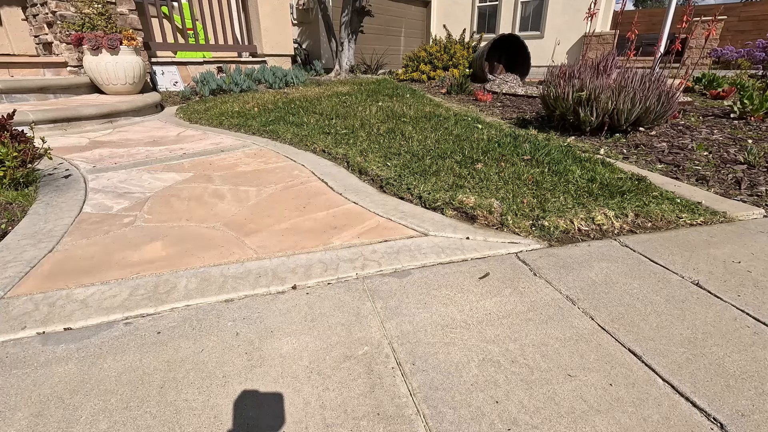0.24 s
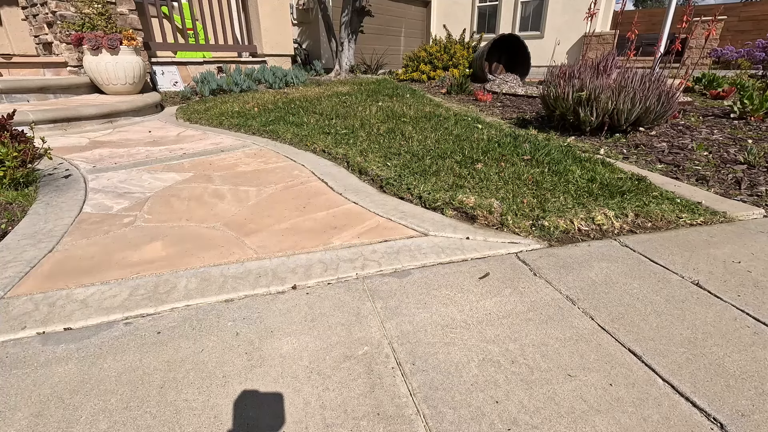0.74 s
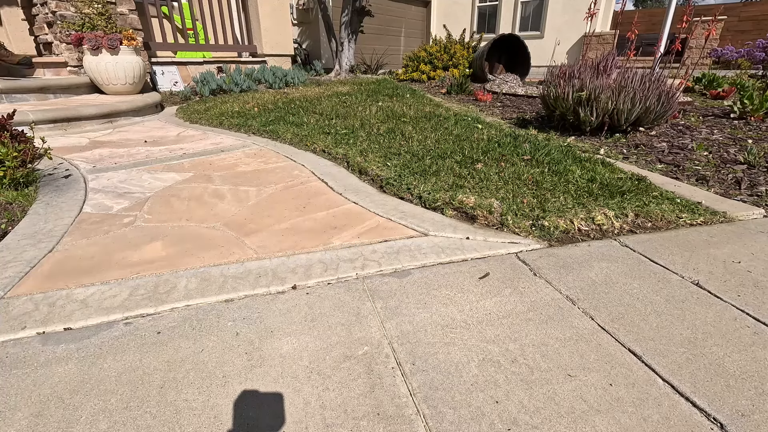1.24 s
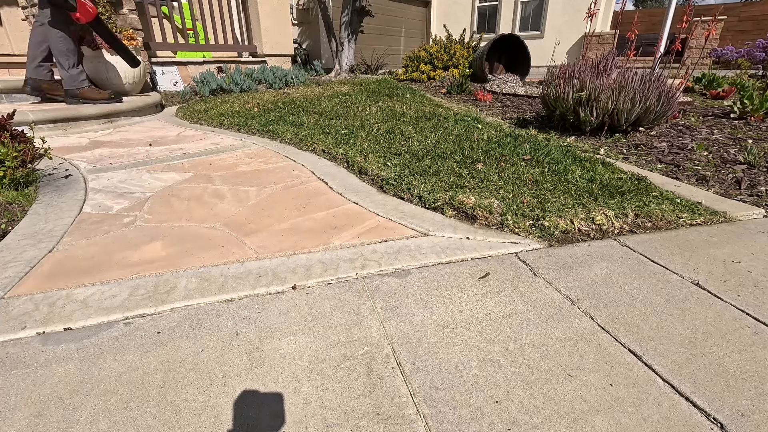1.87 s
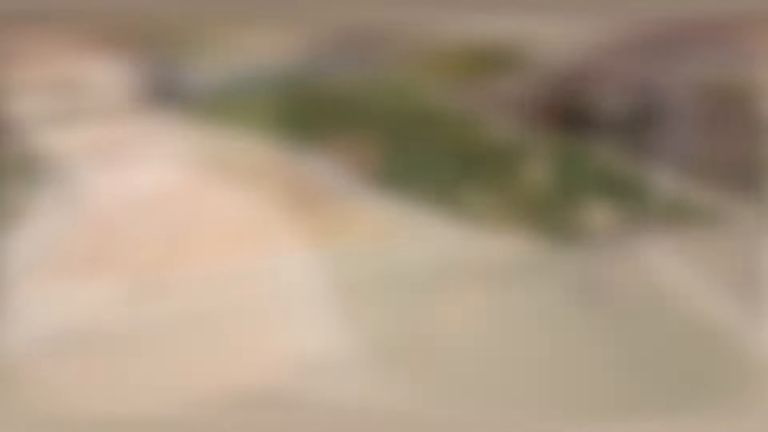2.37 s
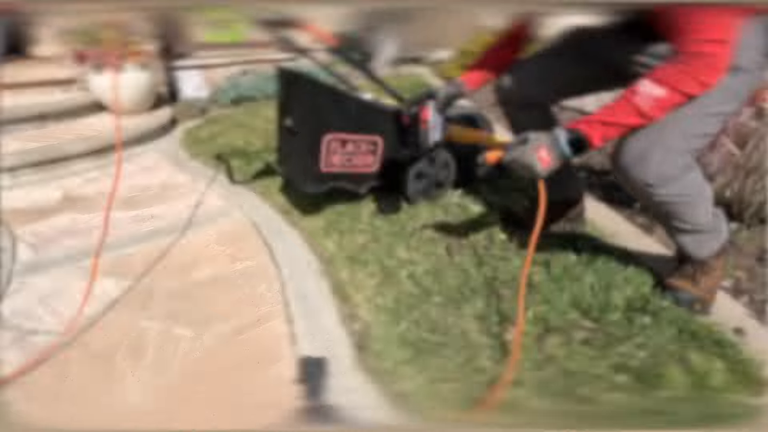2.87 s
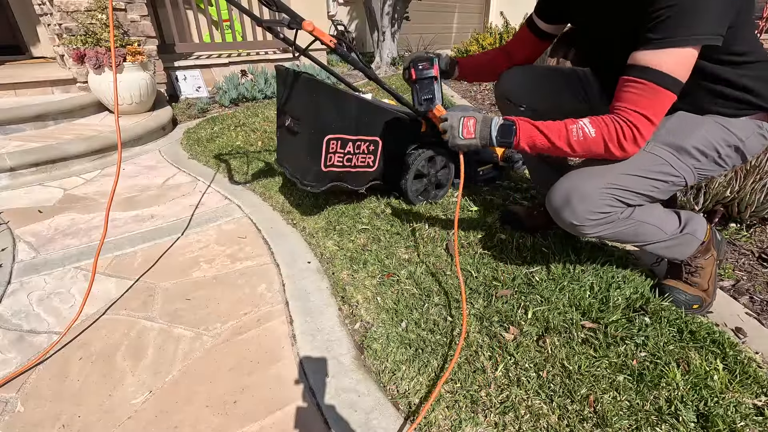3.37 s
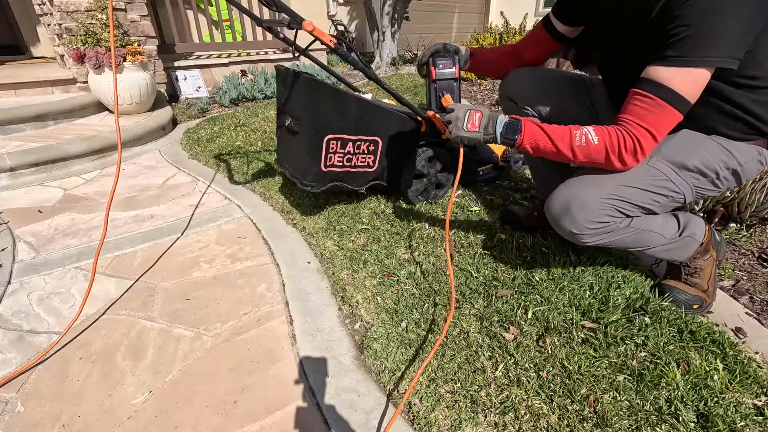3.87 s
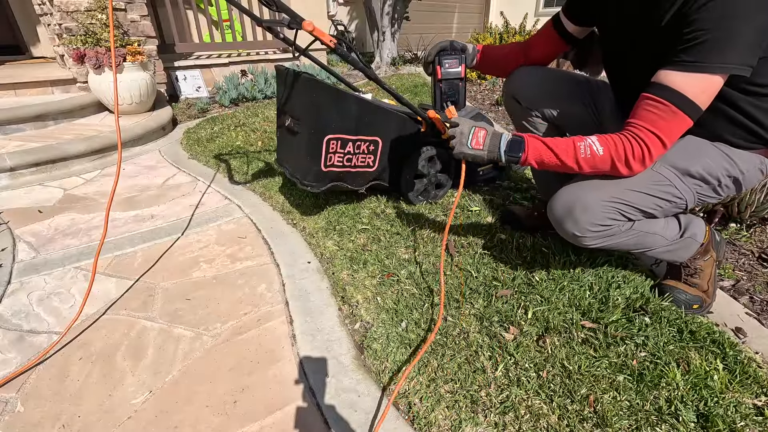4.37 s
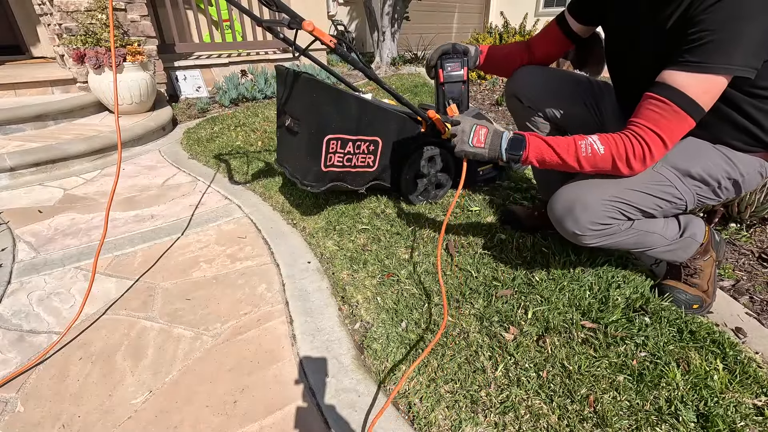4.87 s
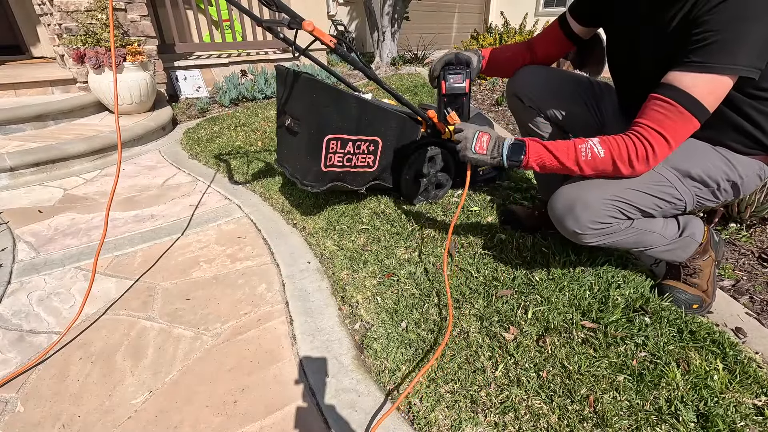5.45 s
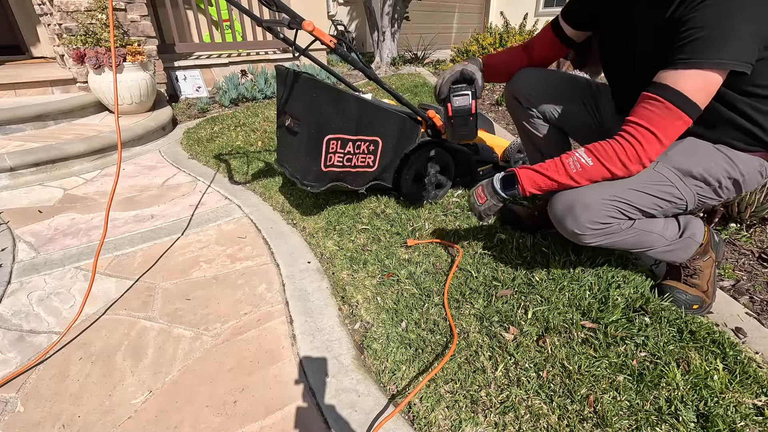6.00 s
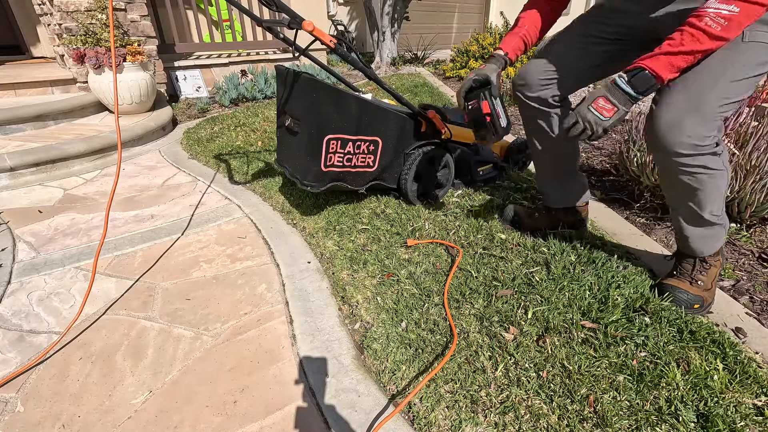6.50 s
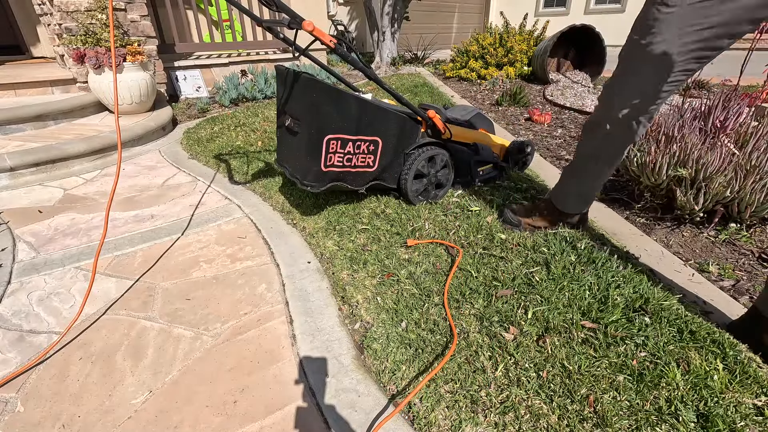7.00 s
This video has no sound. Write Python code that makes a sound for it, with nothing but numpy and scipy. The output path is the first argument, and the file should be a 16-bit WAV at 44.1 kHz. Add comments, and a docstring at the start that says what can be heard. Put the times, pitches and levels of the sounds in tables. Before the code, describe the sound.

Outdoors by a house, an electric mower motor spins down, abruptly surges to a shrill wavering whine with airy roar, stutters as its pitch dips, then coasts to a stop. Quiet yard with low traffic rumble remains. Close by, a plastic latch snaps repeatedly with hollow housing knocks and glove rustle; finches chirp to the left. Soft steps end it. The stereo microphone is near, with short wall reflections.

```python
"""An electric motor on a lawn coasts down, is switched on, whines, sputters as its pitch dips and recovers, and
coasts to rest: its tones follow the shaft speed, over a roar of noise. Far traffic is filtered noise, and
hands and shoes rustle in fine noise grains. Finches chirp to the left in gliding tones. A plastic latch is
snapped again and again: noise bursts ring damped modes. House walls answer with a decaying noise tail."""
import sys
import numpy as np
from scipy import signal
from scipy.fft import rfft, irfft, next_fast_len
from scipy.io import wavfile
from scipy.ndimage import uniform_filter1d, map_coordinates

SR = 44100
rng = np.random.default_rng(int(sys.argv[2]) if len(sys.argv) > 2 else 0)


def to_wav(s):
    """Save 16-bit WAV."""
    ch = np.atleast_2d(s).T  # columns
    pcm = np.round(np.clip(ch, -1, 1) * 32767)  # PCM
    wavfile.write(sys.argv[1], SR, pcm.astype(np.int16))


N = 318930

# Levels in the tables are relative: the functions trim them, and the spectra give only a shape.

# Commutator tone while driven, 12 bars a turn: (time [s], pitch [Hz])
DRIVEN_PITCH = [(.325, 540), (.346, 1800), (.36, 2450), (.376, 2975), (.4, 3100), (.44, 3210), (.5, 3300),
                (.57, 3345), (.7, 3356), (1.485, 3358), (1.545, 2950), (1.57, 3190), (1.603, 3275),
                (1.64, 2950), (1.68, 2750), (1.75, 3080), (1.772, 2700), (1.8, 2600), (1.83, 2950),
                (1.868, 3090), (1.9, 2590)]
# Moments at which each coast would come to rest if left alone: time [s]
REST_TIMES = (1.098, 3.116)
# Spans of full motor power: (start [s], end [s])
POWER_SPANS = [(.315, 1.49), (1.543, 1.734), (1.685, 2.1), (1.805, 1.96)]
# Whine wavering while driven: (time [s], bar tone level [dB], octave level [dB])
WHINE_LEVELS = [(.325, -41, -64), (.365, -55, -39), (.385, -31.5, -32), (.44, -37, -32), (.57, -29.5, -28),
                (.66, -37.5, -34.5), (.766, -30, -27.5), (.89, -36, -42), (.95, -22, -38),
                (1, -29.5, -29.5), (1.066, -49, -33), (1.095, -25.5, -36), (1.144, -37, -27),
                (1.3, -33, -31.5), (1.42, -32, -34), (1.49, -41, -25.5), (1.52, -38, -52),
                (1.585, -33.5, -29), (1.63, -66, -43), (1.68, -63, -62), (1.71, -30.5, -44),
                (1.75, -37, -32), (1.772, -33, -55), (1.815, -44, -55), (1.865, -27, -33.5),
                (1.9, -39, -64)]
# Pitches the shell favours while coasting: (bar tone pitch [Hz], bar tone level [dB])
COAST_BAR = [(220, -90), (280, -50), (340, -54), (460, -51.5), (530, -43.5), (600, -42.5), (700, -55),
             (790, -59), (890, -53), (980, -59), (1090, -35.5), (1200, -45), (1350, -37.5), (1600, -42),
             (1850, -24.5), (2000, -28), (2300, -40), (2600, -31.5)]
# The same for the octave: (bar tone pitch [Hz], octave level [dB])
COAST_OCTAVE = [(600, -85), (690, -50), (800, -62), (900, -51), (980, -70), (2600, -75)]
# Rasps of the housing as current surges in: (start [s], length [s], pitch [Hz], level [dB])
SURGE_RASPS = [(0.31, .047, 3210, -33.5), (.33, 0.031, 1824, -29), (0.337, 0.046, 1417, -29.5),
               (0.349, 0.022, 2480, -28.5), (1.687, 0.024, 3260, -30), (1.802, 0.02, 3230, -27)]
# Once-a-turn shake: (time [s], level [dB])
SHAKE_LEVELS = [(0.34, -46), (0.366, -30.5), (0.4, -27), (0.432, -30.5), (0.56, -24.5), (0.87, -28.5),
                (1.088, -24), (1.162, -32.5), (1.18, -24.5), (1.26, -21.5), (1.342, -27.5), (1.468, -25),
                (1.542, -36.5), (1.616, -23), (1.676, -57), (1.708, -22), (1.744, -48), (1.764, -35.5),
                (1.874, -27), (1.898, -32), (1.93, -34), (2.0, -32.5)]
# Higher shaft orders: (multiple of shaft speed, level against the shake [dB])
SHAFT_ORDERS = [(2, -20.5), (3, -24), (4, -13), (5, -17.5), (6, -19.5), (7, -20.5), (8, -27), (9, -24.5),
                (13, -31.5), (36, -28)]
# Roar of cooling air and brushes: (frequency [Hz], density [dB per Hz])
ROAR_SPECTRUM = [(330, -46), (560, -3), (700, -14.5), (1120, -7), (1900, -10), (2380, -10.5), (3100, -6.5),
                 (3600, -9), (4300, -12), (5800, -7.5), (7200, -7), (10000, -21.5), (12400, -22.5),
                 (14500, -37), (15600, -58)]
# Low flutter: (frequency [Hz], density [dB per Hz])
FLUTTER_SPECTRUM = [(40, -35.5), (90, -1.5), (170, 4), (300, 0), (480, -0.5), (650, -33.5)]
# Puffs of the flutter: (time [s], level [dB])
FLUTTER_PUFFS = [(.34, -28.5), (.42, -30.5), (.69, -29), (.75, -29.5), (.85, -26.5), (.96, -29.5),
                 (1.01, -39), (1.13, -34.5), (1.48, -40.5), (1.65, -46.5), (1.776, -39)]
# Motor balance: (frequency [Hz], left minus right [dB])
MOTOR_BALANCE = [(60, 2.5), (100, -2), (180, 0), (310, 1.5), (550, 1), (950, 4.5), (1650, 3.5), (2860, 5.5),
                 (4970, 5.5), (8640, 4.5), (15000, 9.5)]
# Stereo width of the roar: (frequency [Hz], left-right likeness [-1 to 1])
MOTOR_LIKENESS = [(60, 0.85), (150, 0.86), (380, 0.8), (950, 0.95), (2380, 0.84), (5980, 1), (15000, 0.32)]
# Stereo width of flutter and traffic rumble: (frequency [Hz], left-right likeness [-1 to 1])
RUMBLE_LIKENESS = [(30, .72), (70, .88), (150, .97)]

# Low traffic rumble: (time [s], level [dB])
RUMBLE_LEVELS = [(0, -45.5), (.3, -44), (2, -45), (2.15, -52), (2.63, -47.5), (2.72, -41), (3.45, -41.5),
                 (3.85, -44), (4.55, -43), (4.8, -44), (5.05, -43), (5.7, -46.5), (6.07, -46),
                 (6.48, -48.5), (6.65, -45), (7, -41), (7.23, -49.5)]
# Its colour: (frequency [Hz], density [dB per Hz])
RUMBLE_SPECTRUM = [(12, -20), (20, 4.5), (64, 5.5), (125, -5.5), (189, -14), (258, -25), (400, -41),
                   (520, -35.5), (880, -120)]
# Steady far traffic: (frequency [Hz], density [dB per Hz])
TRAFFIC_SPECTRUM = [(76, -8.5), (130, 1), (213, -2), (283, -4.5), (454, -14.5), (1080, -13), (2690, -26),
                    (3010, -22.5), (4570, -40.5), (5960, -40.5), (12000, -50.5), (15600, -99),
                    (22000, -120)]
# Its stereo width: (frequency [Hz], left-right likeness [-1 to 1])
TRAFFIC_LIKENESS = [(60, 1), (180, 0.96), (550, 0.75), (1650, 1), (4970, 0.43), (15000, 0.62)]
# Running rustle: (time [s], level [dB])
RUSTLE_LEVELS = [(0, -49), (.13, -69.5), (2.1, -61.5), (2.93, -64), (3.43, -71), (3.6, -79), (5.44, -76.5),
                 (6, -68), (6.5, -69.5), (7.01, -62.5), (7.17, -54.5)]
# Colour of rustle and scuffs: (frequency [Hz], density [dB per Hz])
RUSTLE_SPECTRUM = [(500, -23.5), (1200, 0.5), (2500, -6.5), (4000, -6.5), (7500, -10), (9000, -17.5),
                   (12000, -21.5), (15000, -24)]
# Short scuffs of glove, cord and shoe: (loudest [s], rise [s], fall [s], level [dB])
SCUFF_EVENTS = [(2.68, 0.14, 0.16, -57.5), (3.5, 0.2, 0.31, -59.5), (4.145, 0.015, 0.036, -56.5),
                (4.8, 0.016, 0.036, -64), (5.615, 0.011, 0.053, -54), (5.79, 0.017, .02, -66),
                (5.848, 0.02, 0.022, -40.5), (5.88, 0.028, 0.021, -58), (6.02, 0.016, 0.016, -58.5),
                (6.45, 0.1, 0.14, -55.5), (6.76, 0.15, 0.054, -54.5), (6.955, 0.012, 0.014, -50),
                (7.19, 0.033, 0.1, -49)]

# Finch notes: (start [s], length [s], from [Hz], to [Hz], level [dB], share held before the glide)
FINCH_CHIRPS = [(2.715, 0.041, 3600, 3200, -69, .3), (2.827, 0.06, 3050, 3500, -67.5, 0.32),
                (3.187, .045, 3680, 2950, -62.5, 0.39), (3.451, 0.057, 3770, 2970, -62, 0.47),
                (3.715, 0.058, 2930, 3370, -65, .2), (4.484, 0.06, 3430, 2940, -62.5, .35),
                (5.01, 0.065, 3320, 2670, -65.5, 0.35), (5.019, .035, 4300, 3710, -70, 0.36),
                (5.045, 0.037, 6000, 3860, -68.5, 0.0089), (5.066, 0.053, 3050, 3100, -58, 0.38),
                (5.442, .045, 3520, 2920, -61.5, 0.39), (5.48, .03, 2960, 2930, -67, 0.32),
                (5.744, 0.011, 7100, 4340, -67.5, 0.39), (5.902, .07, 3475, 2420, -62.5, 0.48),
                (5.935, 0.032, 6300, 4770, -76, .01), (6.611, 0.047, 4200, 3250, -64, 0.45),
                (6.62, .035, 3150, 2300, -62, 0.38), (6.654, 0.041, 3200, 3600, -52, 0.012)]
# Hoarse squeaks: (start [s], length [s], from [Hz], to [Hz], level [dB], share held before the glide)
FINCH_SQUEAKS = [(2.123, 0.029, 3960, 3900, -50.5, .3), (2.211, 0.072, 3226, 3410, -55, .4),
                 (2.232, 0.088, 3800, 4250, -50.5, 0.44)]

# Bright snaps of the latch: (time [s], level [dB], T60 [s], brightest frequency [Hz])
LATCH_SNAPS = [(2.6956, -32.5, 0.036, 4850), (2.738, -40, 0.023, 2320), (3.046, -41, 0.056, 2660),
               (3.5864, -28, 0.023, 2650), (3.8562, -27, 0.046, 2580), (3.8708, -20, 0.038, 2680),
               (3.9763, -36.5, 0.02, 3420), (4.1998, -23, 0.039, 2900), (4.208, -30, 0.028, 2510),
               (4.2178, -19, 0.041, 3370), (4.243, -31.5, 0.055, 2060), (4.5317, -20.5, 0.051, 3360),
               (4.587, -45.5, 0.03, 3020), (4.8515, -19.5, 0.026, 3630), (4.8726, -24.5, 0.02, 1800),
               (5.1452, -15.5, 0.023, 5400), (5.1704, -30, 0.058, 1820), (5.1991, -38.5, 0.028, 2670),
               (5.4008, -16, 0.022, 3800), (5.4195, -24, 0.034, 1910), (5.4398, -31.5, 0.036, 3490),
               (6.521, -38.5, 0.023, 6310), (6.7625, -30, 0.027, 2630), (7.0433, -38, 0.026, 2760)]
# Damped modes of the latch: (frequency [Hz], width [Hz], level [dB])
LATCH_MODES = [(1900, 294, -0.5), (2640, 276, -0.5), (3436, 344, 0), (4380, 880, -9.5), (5860, 350, 1.5),
               (7040, 1540, -7), (8470, 1000, -7)]
# Hollow knocks of the housing: (time [s], level [dB])
HOUSING_KNOCKS = [(3.871, -45.5), (4.246, -28), (4.55, -34.5), (4.557, -40), (4.872, -32.5), (5.163, -30),
                  (5.171, -52), (5.411, -28.5), (5.421, -23), (5.442, -33), (5.454, -44)]
# Modes of the hollow housing: (frequency [Hz], level [dB], T60 [s])
HOUSING_MODES = [(658, 2.5, 0.028), (752, -8.5, 0.049), (1050, -7, 0.023), (1353, -5, 0.02),
                 (1880, -7, 0.021)]
# Heel thuds: (time [s], level [dB], pitch [Hz])
HEEL_THUDS = [(6.997, -26, 128), (7.074, -32, 173), (7.122, -36, 130)]
# Dull taps and steps: (time [s], peak level [dB], centre [Hz], click against the dull mode [dB])
DULL_TAPS = [(2.447, -50, 1500, -20), (2.622, -44, 1500, -30), (2.582, -30, 1129, -28),
             (2.809, -38.5, 288, -54), (2.857, -38, 278, -50), (2.931, -36, 272, -49),
             (3.337, -46, 1510, -35), (3.72, -42, 284, -48), (4.131, -45.5, 279.5, -54.5),
             (4.308, -30.5, 680, -51), (4.314, -37.5, 320, -22.5), (4.721, -43.5, 1000, -34),
             (4.724, -37, 284, -49), (5.77, -37.5, 1240, -22), (6.954, -34.5, 730, -35), (7, -37, 480, -20),
             (7.023, -28, 1060, -20), (7.074, -40.5, 442, -34), (7.097, -34.5, 980, -17),
             (7.189, -39, 1500, -14)]

# Decay of the house walls' answer: (frequency [Hz], T60 [s])
WALL_DECAY = [(200, 0.2), (3000, 0.42), (10000, 0.032)]
# Treble roll-off: (frequency [Hz], level [dB])
TREBLE_ROLLOFF = [(9000, 0), (12000, -6), (14000, -6.5), (14900, -27), (15600, -42)]

# Coasting against air drag and bearing friction: pitch = EVEN_HZ * tan(SLOWING * time left to rest)
EVEN_HZ, SLOWING = 421, 1.16  # bar pitch where both brake alike [Hz], rate [1/s]
FIRST_COAST_DB = -5  # the first coast whines softer
CURRENT_RISE_S, CURRENT_FALL_S = 0.035, 0.06
UNSTEADY, UNSTEADY_FREE = 0.0013, 0.008  # share by which the speed shakes, under full current and without
ORDERS_POWERED_DB = 8  # the higher shaft orders fade by this much without current
ROAR_DB, ROAR_GROWS, ROAR_POWERED_DB = -38, 1.59, 9.5  # at top speed; dB per dB of speed; added by full current
HISS_HZ, HISS_GROWS = 5950, 0.44  # the roar above this dies faster as the shaft slows; exponent
PUFF_S, FLUTTER_DB = 0.027, -41  # half width of a puff; floor between puffs
TRAFFIC_DB = -53.5
# Shape of a whistled note
LOUDEST_AT, ENDS_DB, GLIDE = 0.59, -10.5, 0.45  # share of length at its loudest; level at ends; share gliding
SCOOP_HZ, SCOOP_S = 248, 0.008  # starts this flat and slides up to pitch; time constant
LOW_NOTE_DB, FULL_HZ = 10, 3240  # a finch loses this much per octave under its full voice
STEP_T60_S = 0.023
TOP_HZ = 15650


def amp(db):
    """Gain of a level in dB."""
    return 10 ** (np.asarray(db) / 20)


def unit(x):
    """x at rms 1."""
    return x / np.sqrt(np.mean(x ** 2) + 1e-20)


def peak(x):
    """x with its largest swing at 1."""
    return x / np.abs(x).max()


def along(points, hz):
    """Reads (frequency, value) points on a log frequency axis."""
    f, v = np.transpose(points)
    return np.interp(np.log(hz + 1), np.log(f + 1), v)


def curves(table):
    """One value per sample for each column after the time."""
    s, *cols = np.transpose(table)
    return [np.interp(np.arange(N) / SR, s, c) for c in cols]


def wobble(rate):
    """A smooth random curve, rate knots a second."""
    knots = rng.standard_normal(int(N * rate / SR) + 4)
    return map_coordinates(knots, [np.arange(N) * rate / SR])


def add(track, s, x):
    """Mixes x into track at time s."""
    track[round(s * SR):][:len(x)] += x


def filtered(x, response):
    """x times a response of frequency."""
    m = next_fast_len(N + SR // 2)
    return irfft(rfft(x, m) * response(np.fft.rfftfreq(m, 1 / SR)), m)[..., :N]


def rush(spectrum, alike):
    """Stereo noise of rms 1; the share of mid and side sets how alike left and right are."""
    def mid_side(hz):
        turn = np.arccos(np.clip(along(alike, hz), -1, 1)) / 2
        return amp(along(spectrum, hz)) * [np.cos(turn), np.sin(turn)]

    mid, side = filtered(rng.standard_normal((2, N)), mid_side)
    return unit(np.array([mid + side, mid - side]))


def walls(x):
    """House walls: a late stereo noise tail in which each frequency dies at its own speed."""
    hz, t, z = signal.stft(rng.standard_normal((2, SR // 2)), SR, nperseg=256)
    decay = amp(-60 * t / along(WALL_DECAY, hz)[:, None])
    tail = signal.istft(z * decay, SR, nperseg=256)[1]
    late = np.pad(x, (900, 0))[None]  # 900 samples, about 20 ms
    return signal.fftconvolve(late, tail / np.linalg.norm(tail[0]), axes=1)[:, :N]


def whistle(length, from_hz, to_hz, db, held=0, rough_hz=0, low_db=0):
    """A swelling, fading tone that holds, glides and holds; pitch shakes by rough_hz, low pitches are weaker."""
    t = np.arange(0, length, 1 / SR)
    glide = np.sin(np.pi / 2 * np.clip((t / length - held) / GLIDE, 0, 1)) ** 2
    scoop = -SCOOP_HZ * np.exp(-t / SCOOP_S)
    roughness = rough_hz * unit(uniform_filter1d(rng.standard_normal(len(t)), size=60))
    pitch = from_hz + scoop + (to_hz - from_hz) * glide + roughness
    edges = np.clip(np.minimum(t, length - t) / 0.0022, 0, 1)
    swell_db = np.interp(t / length, [0, LOUDEST_AT, 1], [ENDS_DB, 0, ENDS_DB])
    swell_db = swell_db + low_db * np.minimum(np.log2(pitch / FULL_HZ), 0)
    return np.sqrt(2) * edges * amp(db + swell_db) * np.sin(2 * np.pi * np.cumsum(pitch) / SR)


def coasts():
    """Where the first and the last coast run: before and after the driven stretch."""
    t = np.arange(N) / SR
    return t < DRIVEN_PITCH[0][0], t > DRIVEN_PITCH[-1][0]


def speed():
    """Pitch of the commutator tone: drag and friction slow it, the drawn curve drives it, then it slows again."""
    (driven_hz,), (first, last) = curves(DRIVEN_PITCH), coasts()
    left = np.where(first, REST_TIMES[0], REST_TIMES[1]) - np.arange(N) / SR
    left = np.clip(left, 0, REST_TIMES[1] - DRIVEN_PITCH[-1][0])
    # 1 Hz is kept at rest so that its logarithm exists
    return np.where(first | last, EVEN_HZ * np.tan(SLOWING * left), driven_hz) + 1


def motor_current():
    """Motor current, 0 to 1: the strongest of overlapping ramped spans."""
    t = np.arange(N) / SR
    spans = [np.clip(np.minimum((t - start) / CURRENT_RISE_S, 1 - (t - end) / CURRENT_FALL_S), 0, 1)
             for start, end in POWER_SPANS]
    return np.max(spans, axis=0)


def shaft_tone(turn, order, db, waver_db):
    """A sine at a multiple of the shaft angle, its level wavering."""
    level = np.sqrt(2) * amp(db + waver_db * wobble(60))
    return level * np.sin(order * turn + rng.uniform(0, 2 * np.pi))


def commutator(turn, bar_hz, current):
    """Whine of the 12 commutator bars and its octave, with wall echoes and rasps of the housing."""
    (first, last), (whine_db, whine_octave_db) = coasts(), curves(WHINE_LEVELS)
    coasting, first_db = first | last, FIRST_COAST_DB * first
    bar_db = np.where(coasting, along(COAST_BAR, bar_hz) + first_db, whine_db)
    octave_db = np.where(coasting, along(COAST_OCTAVE, bar_hz) + first_db, whine_octave_db)
    chatter_db = 4.5 - 1.42 * current  # the brushes chatter more when running free
    bars = shaft_tone(turn, 12, bar_db, chatter_db) + shaft_tone(turn, 24, octave_db, chatter_db)
    bars = bars + amp(-12.5) * walls(bars)  # echoes break up the gliding tone
    for s, length, hz, db in SURGE_RASPS:
        add(bars.T, s, whistle(length, hz, hz, db, rough_hz=186)[:, None])
    return bars


def shaft_shake(turn, current):
    """Imbalance shakes once a turn and at multiples of it, which strengthen with current."""
    (shake_db,) = curves(SHAKE_LEVELS)
    shake = shaft_tone(turn, 1, shake_db, waver_db=1.5)
    for order, db in SHAFT_ORDERS:
        order_db = shake_db + db + ORDERS_POWERED_DB * (current - 1)
        shake = shake + shaft_tone(turn, order, order_db, waver_db=3.0)
    return shake


def motor_roar(turn, bar_hz, current, driven):
    """Cooling air and brushes roar louder with speed and current; the hiss dies first as the shaft slows."""
    speed_db = 20 * np.log10(bar_hz / bar_hz.max())
    roar_db = ROAR_DB + ROAR_GROWS * speed_db + ROAR_POWERED_DB * current
    throb = 1 + 0.15 * np.sin(turn)  # the fan throbs once a turn
    roar = amp(roar_db + 0.88 * wobble(14.52)) * rush(ROAR_SPECTRUM, MOTOR_LIKENESS) * throb
    hiss = filtered(roar, lambda hz: 1 / (1 + (HISS_HZ / (hz + 1)) ** 4))
    return roar - (1 - driven ** HISS_GROWS) * hiss


def motor_flutter():
    """Low noise swelling in short puffs."""
    t = np.arange(N) / SR
    puffs = amp(FLUTTER_DB) + sum(amp(db) * np.exp(-((t - s) / PUFF_S) ** 2) for s, db in FLUTTER_PUFFS)
    return puffs * amp(3 + 0.47 * wobble(18)) * rush(FLUTTER_SPECTRUM, RUMBLE_LIKENESS)


def motor():
    """Shaft orders and commutator tones locked to one shaft angle, over roar and flutter."""
    bar_hz, current = speed(), motor_current()
    unsteady = (UNSTEADY * current + UNSTEADY_FREE * (1 - current)) * wobble(30)
    turn = 2 * np.pi * np.cumsum(bar_hz * (1 + unsteady)) / SR / 12  # shaft angle [rad]
    driven = np.clip(bar_hz / 2400, 0, 1) ** 3  # imbalance force grows fast with speed
    sound = commutator(turn, bar_hz, current) + motor_roar(turn, bar_hz, current, driven)
    sound = sound + (shaft_shake(turn, current) * driven + motor_flutter()) * driven
    return filtered(sound, lambda hz: amp(np.outer([0.5, -0.5], along(MOTOR_BALANCE, hz))))


def traffic():
    """Far traffic: a lumpy low rumble drifting between the sides, over a steady noise bed."""
    (rumble_db,) = curves(RUMBLE_LEVELS)
    balance_db = np.outer([0.5, -0.5], 1.2 + 1.8 * wobble(1.6))
    rumble = amp(rumble_db + balance_db + 1.6 * wobble(12.0)) * rush(RUMBLE_SPECTRUM, RUMBLE_LIKENESS)
    return rumble + amp(TRAFFIC_DB + 0.42 * wobble(3)) * rush(TRAFFIC_SPECTRUM, TRAFFIC_LIKENESS)


def rustle():
    """Rustle and scuffs made of fine scratchy grains: noise whose level jitters fast."""
    (rustle_db,), scuffs = curves(RUSTLE_LEVELS), np.zeros(N + SR)
    for s, rise, fall, db in SCUFF_EVENTS:
        t = np.arange(-rise, fall, 1 / SR)
        add(scuffs, s - rise, amp(db) * np.interp(t, [-rise, 0, fall], [0, 1, 0]) ** 1.9)
    grains = amp(0.98 * wobble(40) + 2.6 * wobble(400))
    scratch = unit(grains * rush(RUSTLE_SPECTRUM, [(1000, 0.6), (10000, 0.77)]))  # (Hz, likeness)
    return (amp(rustle_db + 5) + scuffs[:N]) * scratch


def finches():
    """Gliding whistles, each repeated by a near wall, and some hoarse squeaks whose pitch shakes hard."""
    out = np.zeros(N + SR)
    for s, *note in FINCH_CHIRPS:
        for delay, gain_db in [(0, 10.5), (0.028, 7.5), (0.043, -5), (0.061, -9)]:  # direct, then echoes
            add(out, s + delay, amp(gain_db) * whistle(*note, rough_hz=55, low_db=LOW_NOTE_DB))
    for s, *note in FINCH_SQUEAKS:
        add(out, s, whistle(*note, rough_hz=329.5))
    return out[:N]


def mode(f, hz, width):
    """Response at frequencies f of one damped resonance, 1 at its centre."""
    return 1j * f * width / (hz * hz - f * f + 1j * f * width)


def latch_snap(t, f, t60, bright_hz):
    """A noise burst with a sharp attack and a faint tail rings the latch's damped modes."""
    body = 0
    for k, (hz, width, level) in enumerate(LATCH_MODES):
        near_db = -5 * np.log2(hz / bright_hz) ** 2  # where it is struck favours some modes
        body = body + (-1) ** k * amp(level + near_db) * mode(f, hz, width)
    decay = 2 * amp(-60 * t / 0.0033) + amp(-60 * t / t60) + 0.065 * amp(-60 * t / 0.12)
    return peak(irfft(rfft(decay * rng.standard_normal(len(t))) * body))


def housing_knock(t):
    """Decaying sines of the hollow housing, a little different in pitch and level at each knock."""
    ring = 0
    for hz, level, t60 in HOUSING_MODES:
        decay = amp(level + rng.normal(0, 1.8) - 60 * t / t60)
        ring = ring + decay * np.sin(2 * np.pi * hz * rng.normal(1, 0.044) * t)
    return ring * (1 - np.exp(-t / 0.0027)) ** 2  # soft attack


def dull_tap(t, f, hz, click_db):
    """A short noise puff through a broad dull mode, with a brighter click mixed in."""
    puff = amp(-60 * t / (0.011 + 5 / hz)) * rng.standard_normal(len(t))
    dull = mode(f, hz, hz * min(0.9, hz / 900)) ** 2
    return peak(irfft(rfft(puff) * (dull + amp(click_db) * mode(f, 1800, 2700))))


def handling():
    """Hands and shoes: latch snaps, housing knocks, heel thuds as decaying sines, and dull taps."""
    out, t = np.zeros(N + SR), np.arange(4096) / SR
    f = np.fft.rfftfreq(len(t), 1 / SR)
    for s, db, t60, bright_hz in LATCH_SNAPS:
        add(out, s, amp(db - 1.5) * latch_snap(t, f, t60, bright_hz))
    for s, db in HOUSING_KNOCKS:
        add(out, s, amp(db + 11.5) * housing_knock(t))
    for s, db, hz in HEEL_THUDS:
        add(out, s, amp(db + 5 - 60 * t / STEP_T60_S) * np.sin(2 * np.pi * hz * t))
    for s, db, hz, click_db in DULL_TAPS:
        add(out, s, amp(db) * dull_tap(t, f, hz, click_db))
    return out[:N]


def scene():
    """Motor and yard, finches to the left, hands slightly right; the walls answer birds and hands."""
    birds, hands = finches(), handling()
    placed_birds = amp([[3], [-3.5]]) * (birds + amp(-9.0) * walls(birds))
    placed_hands = amp([[-0.8], [0.8]]) * hands + amp(-20.5) * walls(hands)
    return motor() + traffic() + rustle() + placed_birds + placed_hands


def record(dry):
    """The treble fades above 9 kHz; nothing passes from TOP_HZ up."""
    return filtered(dry, lambda hz: amp(along(TREBLE_ROLLOFF, hz)) * (hz < TOP_HZ))


dry = scene()
out = record(dry)
to_wav(out)
```